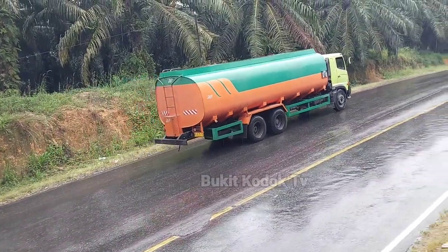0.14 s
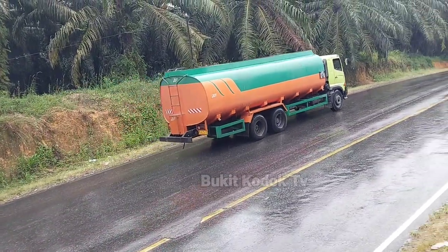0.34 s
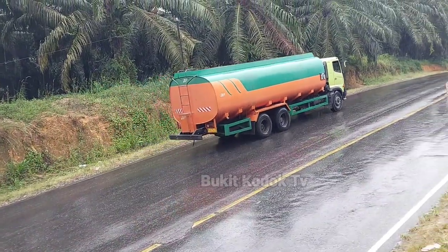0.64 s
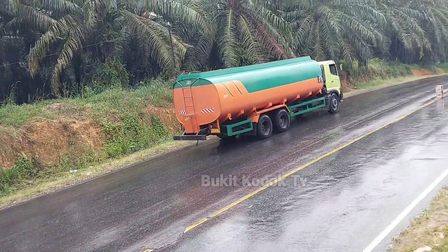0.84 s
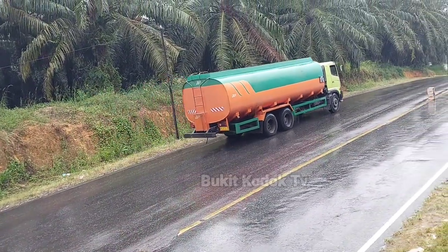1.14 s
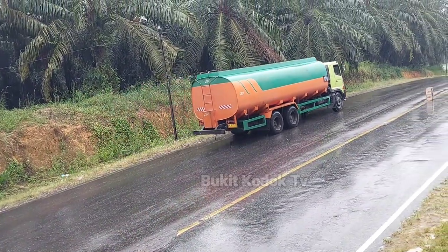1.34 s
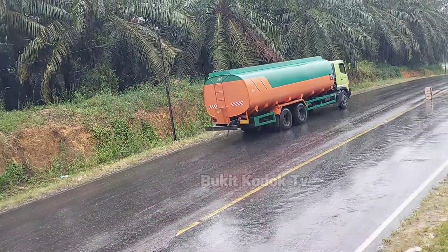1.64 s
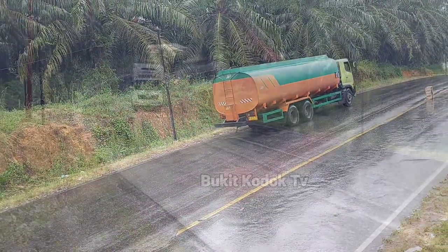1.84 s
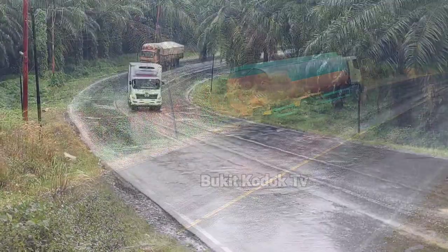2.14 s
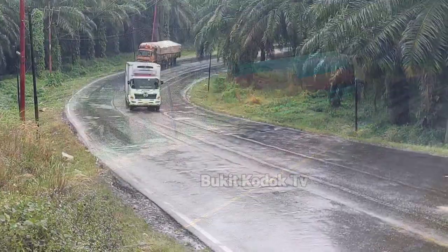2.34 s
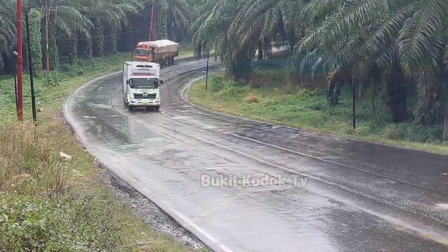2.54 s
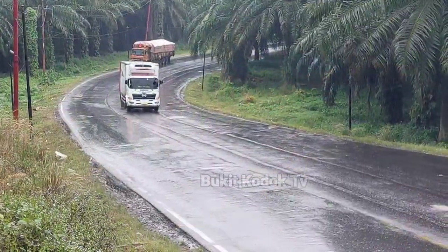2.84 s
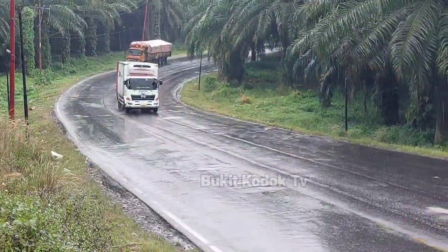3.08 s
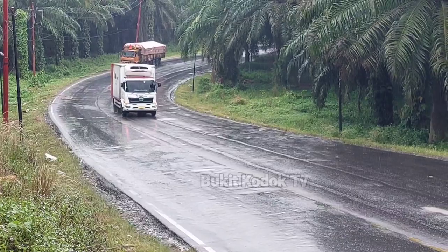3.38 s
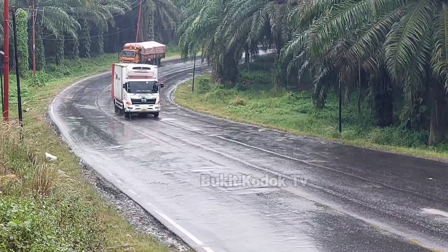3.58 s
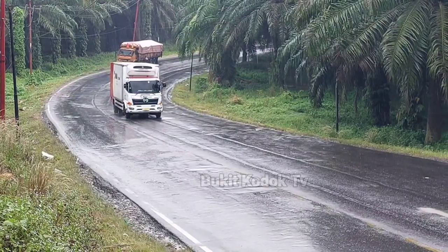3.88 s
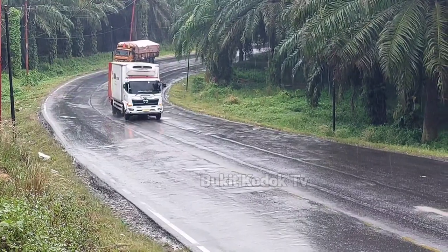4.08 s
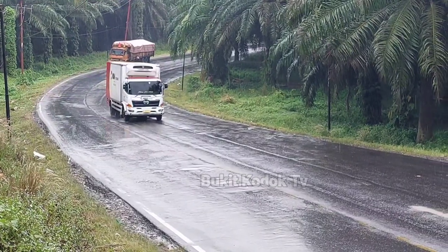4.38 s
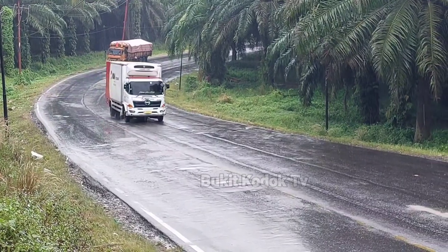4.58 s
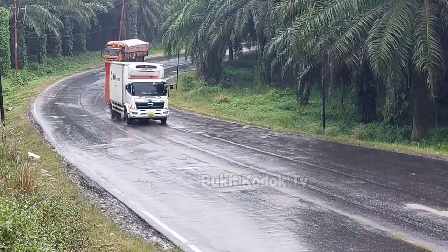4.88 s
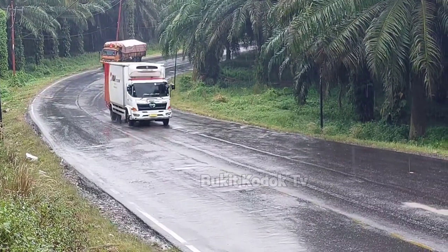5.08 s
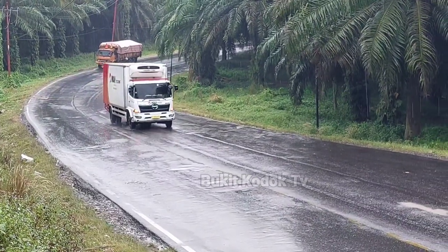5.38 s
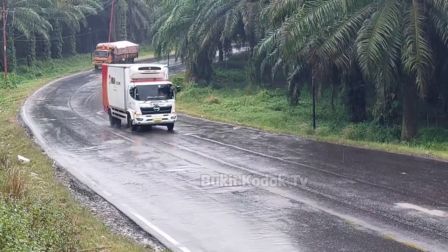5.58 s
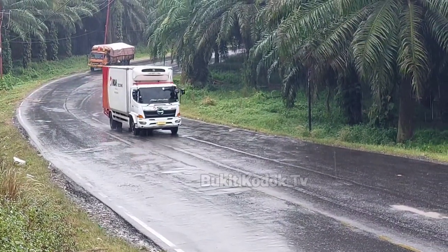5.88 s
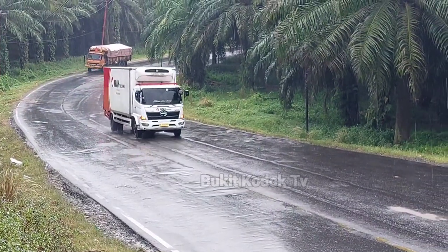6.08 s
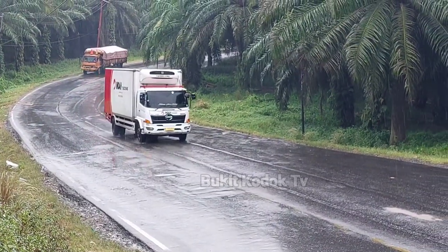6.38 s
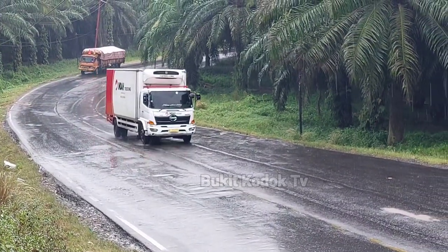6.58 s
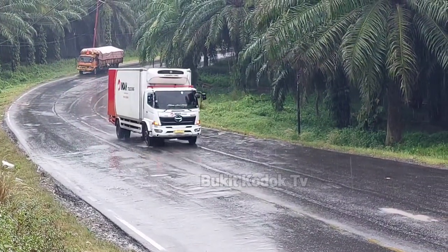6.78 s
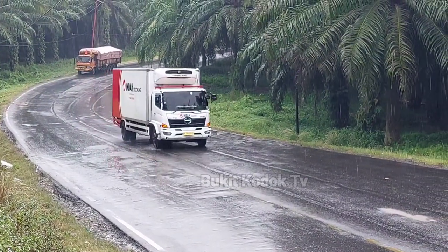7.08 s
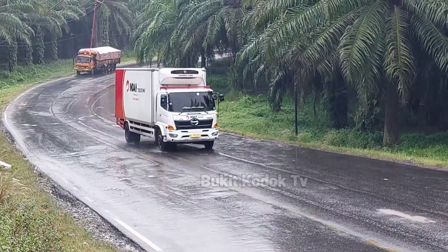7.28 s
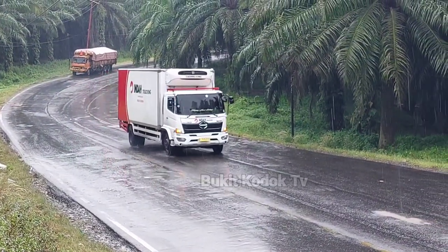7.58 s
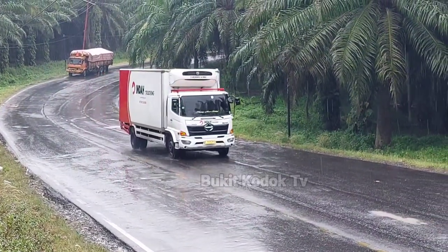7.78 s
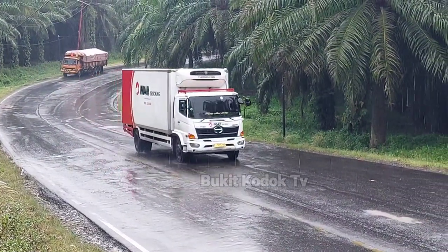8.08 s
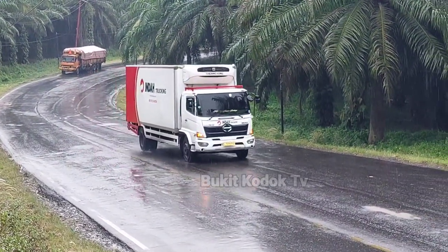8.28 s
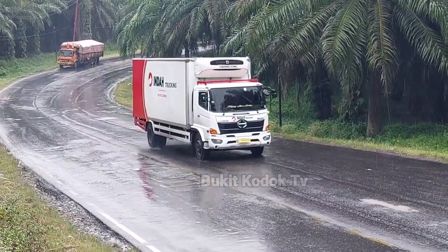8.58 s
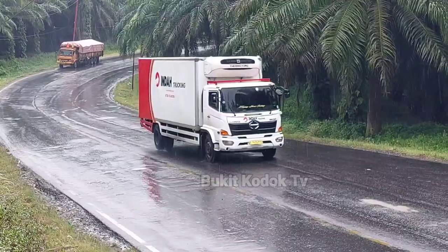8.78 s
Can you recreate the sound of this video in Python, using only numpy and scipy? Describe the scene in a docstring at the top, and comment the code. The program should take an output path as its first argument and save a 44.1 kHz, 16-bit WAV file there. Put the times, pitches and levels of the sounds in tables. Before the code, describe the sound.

A high-revving diesel tanker drives off with roar, thin turbo whistle and wet tyre hiss, then a deeper, lugging truck fades in and approaches.

```python
"""A wet hill road, heard from the verge, with diesel trucks labouring up it.
A six-cylinder tanker pulls away: firing-locked exhaust lines, noise puffs rung through body resonances,
gear whine and a swelling turbo whistle, all faded out by about three seconds.
A four-cylinder box truck fades in and comes nearer: its deep firing note sags under load,
over muffler rasp, block clatter, faint turbo whines, intake rush and filtered-noise tyre hiss."""
import sys
import numpy as np
from scipy import signal
from scipy.fft import rfft, irfft, next_fast_len
from scipy.io import wavfile

SR = 44100
rng = np.random.default_rng(int(sys.argv[2]) if len(sys.argv) > 2 else 0)


def waveform_to_disk(signal):
    """Save audio, clipped to [-1, 1], as 16-bit WAV at the path in sys.argv[1]."""
    frames = np.transpose(np.atleast_2d(signal))
    scaled = np.clip(frames, -1, 1) * 32767
    samples = np.round(scaled).astype(np.int16)
    wavfile.write(sys.argv[1], SR, samples)


N = 393813
TIME = np.arange(N) / SR
SIZE = next_fast_len(N, real=True)
HZ = np.maximum(np.arange(SIZE // 2 + 1) * SR / SIZE, 1)

# exhaust lines locked to the engine: multiple_of_firing_rate, relative_level_db
TANKER_ORDERS = [(.52, -12), (1, 0), (1.88, -14), (2.333, -6.5), (3.39, -13), (4.54, -15), (5.28, -16)]
BOX_ORDERS = [(3, -0.5), (4, -2), (6, -6), (6.65, -6), (7, -9), (7.5, -10), (8, -9), (12.3, -6)]
# singing gears and engine drives: multiple_of_firing_rate, relative_level_db
TANKER_WHINES = [(6.82, -26), (9.43, -14.5), (12.1, -24.5), (14.06, -26), (15.3, -27), (17.3, -27),
                 (25.3, -32), (26.6, -29)]
# strength of each cylinder in firing order: level_db
SIX_CYLINDERS = [0.58, -0.81, 0.31, 0.36, -0.16, 0.98]
FOUR_CYLINDERS = [0.07, 0.11, -0.33, -0.16]
# exhaust and body resonances: centre_hz, width_hz, relative_level_db
TANKER_BODY = [(99, 21, 0.5), (137, 16, 1), (236, 31, -4), (279, 69, -0.7), (328, 34, -2), (438, 55, -11),
               (551, 82, -5.5), (637, 98, -6), (721, 35, -5.5), (1053, 220, -15.5)]
BOX_BODY = [(98, 150, -0.5), (134, 29, 0), (167, 20, -2), (216, 13.5, -1), (238, 51, -2.5)]
# muffler resonances, changing round the bend: centre_hz, width_hz, far_level_db, near_level_db
BOX_MUFFLER = [(378.6, 34, -2, 1.5), (415, 22, 1, -0.5), (447.7, 20, -1.5, 2.5), (489.5, 46, 4, 4.5),
               (546, 29.5, 2, 2), (743, 33, -0.5, -4), (804, 28, -12, -0.5), (898, 24, -10, -8.5),
               (1103, 72, -6.5, -9)]
# ringing of the tanker's engine block: centre_hz, width_hz, relative_level_db
TANKER_BLOCK = [(1045, 26, 6.5), (1493, 33, 2), (1750, 86, 0), (1910, 50, -5), (2110, 31, -0.5),
                (2440, 68, -11), (2530, 52, -10), (3054, 58, -0.5)]
# air intake resonances: centre_hz, width_hz, relative_level_db
INTAKE = [(805, 42, -3), (2340, 180, -10), (3420, 300, 1), (3650, 270, 1.5), (4600, 910, -7)]
# spectrum of the engine block clatter: frequency_hz, relative_level_db
TANKER_CLATTER = [(410, -0.5), (700, 1.5), (870, 0), (1120, -20), (1220, -1.5), (1760, -4.5), (2840, -11.5),
                  (3160, -19), (3900, -60), (4200, -29), (5460, -51), (9240, -120)]
BOX_CLATTER = [(400, -33), (650, -3), (780, -2), (930, -3.5), (1100, -2.5), (1380, -6.5), (1880, -4),
               (2150, -7.5), (2600, -8.5), (3200, -10.5), (3700, -11.5), (4050, -18), (4850, -17),
               (9000, -51)]
# spectrum of the tyre spray: frequency_hz, relative_level_db
TANKER_HISS = [(40, 7), (65, 29.5), (300, 16), (1000, 6), (2100, 11), (3200, 5.5), (3900, 3), (4700, 5),
               (5600, 2.5), (6700, 0.5), (7600, 1.5), (9500, -1.5), (12500, 1), (15500, -5.5)]
BOX_HISS = [(25, 23), (45, 23), (110, 17.5), (300, 21), (1000, 7), (3600, 4), (5500, 3), (7500, 0.5),
            (8700, -3.5), (9700, -1), (12500, -0.5), (15500, -4)]
# stereo width: frequency_hz, side_minus_mid_db
TANKER_WIDTH = [(60, -21), (110, -21), (200, -33), (380, -10), (690, -12), (1280, -3), (2360, -4.5),
                (4350, 3), (8030, 0), (14800, 0)]
BOX_WIDTH = [(60, -17.5), (110, -26), (200, -11), (380, -17.5), (690, -11.5), (1280, -6.5), (2360, -6),
             (4350, -3.5), (8030, 3.5), (14800, 1.5)]
# stereo balance: frequency_hz, left_minus_right_db
TANKER_LEAN = [(60, -1), (110, -3.5), (200, -4.5), (380, -0.5), (690, -3), (1280, -5.5), (2360, -2),
               (4350, 0.5), (8030, 1), (14800, 0.5)]
BOX_LEAN = [(60, -5), (110, 2), (200, -5), (380, -1), (690, -2), (1280, -1.5), (2360, 1), (4350, -2),
            (8030, 1), (14800, 2.5)]
# swells of the tanker's exhaust roar: centre_s, half_width_s, height_db
ROAR_SWELLS = [(.03, .25, -2.5), (.45, 0.15, 1.6), (.85, .17, 1.5), (1.251, .15, 0.4), (1.72, 0.12, 1.6),
               (2.5, .12, -1)]
# swells of the box truck's mutter: centre_s, half_width_s, boom_db, rasp_db, clatter_db
MUTTER_SWELLS = [(2.95, .2, -1.5, 2, 0.5), (3.3, 0.21, 3.5, 0, 1), (3.53, .07, 0, 1.5, -0.5),
                 (3.7, 0.2, -2, -0.5, 1), (4.25, 0.31, 0, 0.5, 2), (5.2, .06, 0, 1.5, -0.5),
                 (5.25, 0.32, 3, -1, 1), (5.7, 0.26, -0.5, -1.5, -1), (6.05, 0.069, -8, -1, 0),
                 (6.55, 0.12, 2.5, -2, 0.5), (7.2, 0.22, 1, 1.5, 0), (7.5, 0.1, -4, -1.5, -1),
                 (8.15, 0.17, 4, 0.5, 1.5), (8.6, 0.22, 2.5, 1.5, 1.5)]
# dips of the box truck's note on its way through the air: centre_s, depth_db, half_width_s, phase_lag_rad
NOTE_DIPS = [(3.33, 7, 0.15, -0.42), (3.71, 6.5, 0.08, 0.5), (3.98, 11.5, 0.074, 1.8),
             (4.22, 3.5, 0.057, 0), (4.42, 3, 0.067, -0.67), (4.8, 4.5, 0.15, 2.1), (5.33, 2, 0.18, 0.39),
             (5.93, 2.5, 0.19, -0.2), (7.05, 3, .16, -1.2), (8.27, 2, 0.18, 1)]
# swells of the tanker's turbo whistle: start_s, end_s, starting_pitch_hz, relative_level_db
WHISTLE_SWELLS = [(-.06, .42, 4405, -33.5), (0.25, .52, 4430, -44), (.52, .72, 4460, -38),
                  (0.8, .99, 4475, -35.5), (0.98, 1.45, 4400, -43), (1.33, 1.96, 4390, -34.5),
                  (1.88, 2.24, 4360, -33), (2.14, 2.74, 4365, -34.5), (2.62, 3.1, 4360, -39),
                  (1.4, 2.75, 4260, -43)]
# breathy strands of the tanker's turbo: pitch_hz, relative_level_db
BREATHY_STRANDS = [(3290, -42.5), (5140, -42), (5205, -40), (5285, -41)]
# box truck turbo whines, as the intake turns to the verge: entry_pitch_hz, level_db, loudest_s, half_width_s
BOX_WHINES = [(3800, -55, 6.9, 1.7), (4850, -61, 6.7, 1.3), (9850, -64, 7.4, 2.7)]
# surges and lulls of the spray: centre_s, half_width_s, height_db
SPRAY_SURGES = [(.33, 0.065, -1.5), (0.469, 0.06, -1), (1.65, 0.3, 0.3), (2.45, 0.048, -1.2),
                (2.61, .05, 4.5), (2.73, 0.12, -4)]
BOX_SURGES = [(2.85, .13, 1.5), (4.45, .14, .7), (5.6, 0.22, -.6), (6.8, 0.55, .5)]   # wetter and drier road

# tanker engine (firings per s): picks up the last of its revs, then hovers
TANKER_HZ, PICKUP_HZ, PICKUP_S = 121.4, 1.9, 0.3
HUNT_HZ = 0.2   # slow hunting of either engine's firing rate
# the roar sinks as the tanker drives off; the note builds as the tailpipe comes into view
TANKER_NOTE_DB, NOTE_BUILD_DB, NOTE_BUILD_S = -20.3, 15, 0.28
ROAR_DB, RECEDE_DB_PER_S, TANKER_SPRAY_DB = -22.5, 2, -27.5
TANKER_FADE_S, TANKER_GONE_S = 1.46, 2.87
# tanker turbo
WHISTLE_ATTACK_S, WHISTLE_RELEASE_S = 0.083, 0.13
WHISTLE_SAG_HZ_PER_S, WHISTLE_WANDER_HZ = 52, 8.35
BREATHY_WANDER_HZ, BREATHY_BUILD_DB, BREATHY_BUILD_S = 17, 2, 0.75
BREATHY_END_S, BREATHY_RELEASE_S = 2.08, 1.28
# box truck: fade-in, and the firing rate (firings per s) at entry, dragged down by the hill
BOX_ENTERS_S, BOX_FADE_S = 1.8, 1
BOX_HZ, SAG_HZ_PER_S = 79.6, 2.36
# box truck approach: distance at entry, road speed, and its bend
DISTANCE_M, SPEED_M_PER_S = 77, 6
BEND_S, BEND_LENGTH_S = 4.6, 2.4
BOX_LAG_S = 4.5e-5   # later arrival on the right side
# box truck firing note, and the tailpipe resonance that lifts its octave
BOX_NOTE_DB, BOX_NOTE_FULL_S = -12.8, 3.15
BOX_NOTE_BUILD_DB_PER_S, BOX_NOTE_RISE_DB, NOTE_WAVER_RAD = 22.5, 10, 0.27
PIPE_HZ, PIPE_HALF_WIDTH_HZ, OCTAVE_DB = 130.5, 6, -36.3
WHINE_SAG_PER_S, WHINE_WANDER = 0.0045, 0.0019   # shares of the pitch
CUTOFF_HZ = 15450


def tanker():
    """Six cylinders at high revs, driving away; the engine fades along a steeper curve than the note."""
    speed = TANKER_HZ - PICKUP_HZ * np.exp(-TIME / PICKUP_S) + HUNT_HZ * drift(0.95)
    firing = turns(speed)
    recede_db = -RECEDE_DB_PER_S * TIME
    fade = release(TANKER_GONE_S, TANKER_GONE_S - TANKER_FADE_S)
    beat = rattle(firing, SIX_CYLINDERS, TANKER_HZ, slack=0.025)
    layers = tanker_roar(firing, beat) + tanker_clatter(firing, beat) + tanker_tones(firing, speed)
    engine = from_db(ROAR_DB + recede_db) * layers
    return fade ** 0.5 * tanker_note(firing, recede_db) + fade ** 0.93 * engine + tanker_spray()


def tanker_note(firing, recede_db):
    """Firing note and its near-half-rate line: pressure pulses from the tailpipe, building then receding."""
    note_db = TANKER_NOTE_DB - NOTE_BUILD_DB * np.exp(-TIME / NOTE_BUILD_S) + 1.3 * recede_db
    note = exhaust_note(firing, TANKER_ORDERS[:2], waver_db=1.8, overtone_waver=0.61)
    return pan(from_db(note_db) * note, left_db=-1.0)


def tanker_roar(firing, beat):
    """Turbulent gas, pulsed at each firing and rung through the exhaust and body."""
    gas = rms_one(puffs(firing, SIX_CYLINDERS, depth=0.2))
    gas = gas + 0.25 * knocks(firing, SIX_CYLINDERS, uneven=0.15) + 0.75 * beat
    roar = outdoors(gas, resonances(TANKER_BODY), TANKER_WIDTH, TANKER_LEAN)
    return from_db(table_swells(ROAR_SWELLS)) * roar


def tanker_clatter(firing, beat):
    """Combustion noise and valve rattle ring the engine block."""
    casing = gain_at(TANKER_CLATTER, HZ) + from_db(-5.5) * resonances(TANKER_BLOCK)
    source = puffs(firing, SIX_CYLINDERS, depth=0.18) + 0.8 * beat
    block = outdoors(source, casing, TANKER_WIDTH, TANKER_LEAN)
    return from_db(-6.0) * patchy(block, depth_db=2.0, rate=14, count=24)


def tanker_tones(firing, speed):
    """Upper exhaust lines and gear whines, both tied to the revs; the exhaust lines sink faster."""
    lines = exhaust_note(firing, TANKER_ORDERS[2:], waver_db=3.0, overtone_waver=0.8)
    gears = 0
    for multiple, db in TANKER_WHINES:
        gears = gears + from_db(db) * whistle(multiple * speed, spread_hz=14.0, rough=1.0)
    return pan(from_db(-6.3 - 3.5 * TIME) * lines + from_db(-1.2 * TIME) * gears, left_db=0.5)


def box_truck():
    """Four cylinders lugging at low revs, coming closer."""
    speed = BOX_HZ - SAG_HZ_PER_S * (TIME - BOX_ENTERS_S) + HUNT_HZ * drift(2)
    firing = turns(speed)
    revs = speed / BOX_HZ
    turned = ramp(BEND_S, BEND_LENGTH_S)
    s, half_width, *heights_db = np.transpose(MUTTER_SWELLS)
    boom_swell, rasp_swell, clatter_swell = (from_db(swells(s, half_width, db)) for db in heights_db)

    muffler = np.array(BOX_MUFFLER)
    low = resonances(BOX_BODY)
    far, near = resonances(muffler[:, [0, 1, 2]]), resonances(muffler[:, [0, 1, 3]])

    fade = ramp(BOX_ENTERS_S, BOX_FADE_S)
    lines = box_lines(firing, low + (far + near) / 2)
    overtones = box_octave(firing, speed) + boom_swell * box_growl(firing, revs) + rasp_swell * lines
    tones = pan(np.sqrt(fade) * box_note(firing) + fade * overtones, left_db=-2.5)
    mutter = boom_swell * box_boom(firing, revs, low) + rasp_swell * box_rasp(firing, far, near, turned)
    return tones + fade * (mutter + clatter_swell * box_clatter(firing) + box_spray())


def box_note(firing):
    """The deep firing note: it builds, then holds, wavering a little, with brief dips that bend its pitch."""
    build_db = np.clip(BOX_NOTE_BUILD_DB_PER_S * (BOX_NOTE_FULL_S - TIME), 0, BOX_NOTE_RISE_DB)
    s, depth_db, half_width, lag = np.transpose(NOTE_DIPS)
    dip_db = swells(s, half_width, depth_db)
    waver = NOTE_WAVER_RAD * drift(3.4) - swells(s, half_width, lag)
    level = from_db(BOX_NOTE_DB - build_db - dip_db + 0.54 * drift(5.7))
    return level * np.sin(2 * np.pi * firing + waver)


def box_octave(firing, speed):
    """The note's octave, swelling as the sagging revs carry it into a tailpipe resonance."""
    pipe = from_db(OCTAVE_DB) / np.hypot(1, (2 * speed - PIPE_HZ) / PIPE_HALF_WIDTH_HZ)
    return pipe * exhaust_note(firing, [(2, 0)], waver_db=3.0, overtone_waver=0.19)


def box_growl(firing, revs):
    """A half-order line from uneven cylinders, weakening with the revs."""
    growl = exhaust_note(firing, [(3.5, 0)], waver_db=2.0, overtone_waver=0.35)
    return from_db(-42.5) * revs ** 1.54 * growl


def box_lines(firing, colour):
    """Higher exhaust lines, lighting up as the sagging revs carry them through the resonances."""
    lines = exhaust_note(firing, BOX_ORDERS, waver_db=3.0, overtone_waver=0.65)
    rung = irfft(rfft(lines, SIZE) * colour, SIZE)[:N]
    return approaching(-42.5, follows=0.3) * rms_one(rung)


def box_boom(firing, revs, low):
    """Gas puffs ring the low exhaust and body resonances, weakening with the revs."""
    boom = outdoors(puffs(firing, FOUR_CYLINDERS, depth=0.071), low, BOX_WIDTH, BOX_LEAN)
    return from_db(-34.0) * revs ** 3.3 * boom


def box_rasp(firing, far, near, turned):
    """Pulsed gas rasps in the muffler, whose colour crossfades as the truck comes round the bend."""
    gas = rms_one(puffs(firing, FOUR_CYLINDERS, depth=0.25))
    gas = gas + 0.4 * knocks(firing, FOUR_CYLINDERS, uneven=0.2)
    gas = gas + 0.75 * rattle(firing, FOUR_CYLINDERS, BOX_HZ, slack=0.02)
    before = (1 - turned) * outdoors(gas, far, BOX_WIDTH, BOX_LEAN)
    after = turned * outdoors(gas, near, BOX_WIDTH, BOX_LEAN)
    return approaching(-41.5, follows=0.56) * (before + after)


def box_clatter(firing):
    """Combustion noise radiated by the engine block, its bands swelling separately."""
    source = puffs(firing, FOUR_CYLINDERS, depth=0.12)
    block = outdoors(source, gain_at(BOX_CLATTER, HZ), BOX_WIDTH, BOX_LEAN)
    level = approaching(-41.0, follows=0.02) * from_db(0.5 * drift(4.0))
    return level * patchy(block, depth_db=1.5, rate=8.4, count=9)


def tanker_turbo():
    """A thin rotor whistle in swells and a few breathy strands, reaching each side by a different path."""
    thin_whistle = 0
    for start, end, hz, db in WHISTLE_SWELLS:
        pitch = hz - WHISTLE_SAG_HZ_PER_S * (TIME - start) + WHISTLE_WANDER_HZ * drift(7.1)
        thin = from_db(-2.0 + 1.5 * drift(13.0)) * whistle(pitch, spread_hz=32, rough=1.8)
        echo = from_db(-8.0) * np.array([whistle(pitch, spread_hz=130, rough=1.8) for side in "LR"])
        swell = from_db(db) * ramp(start, WHISTLE_ATTACK_S) * release(end, WHISTLE_RELEASE_S)
        thin_whistle = thin_whistle + swell * (thin * [[1], [-0.4]] + echo)
    breathy, sway = 0, drift(2.48)   # the strands share the sway
    for hz, db in BREATHY_STRANDS:
        pitch = hz + BREATHY_WANDER_HZ * (drift(4.06) + sway)
        strand = np.array([whistle(pitch, spread_hz=68, rough=3.5) for side in "LR"])
        breathy = breathy + from_db(db) * strand
    build = from_db(-BREATHY_BUILD_DB * (1.5 - ramp(0, BREATHY_BUILD_S)))
    breathy = release(BREATHY_END_S, BREATHY_RELEASE_S) * build * breathy
    return release(end_s=2.94, length_s=1.6) ** 0.63 * thin_whistle + breathy


def box_turbo():
    """Faint whines sinking with the boost, over intake rush that opens up as the cab comes round the bend."""
    rush = outdoors(rng.standard_normal((2, N)), resonances(INTAKE), BOX_WIDTH, BOX_LEAN)
    boost = 1 - WHINE_SAG_PER_S * (TIME - BOX_ENTERS_S) + WHINE_WANDER * drift(1.0)
    whines = 0
    for hz, db, at, half_width in BOX_WHINES:
        tone = np.array([whistle(hz * boost, spread_hz=54, rough=2.0) for side in "LR"])
        whines = whines + swells([at], [half_width], [from_db(db)]) * tone
    intake = approaching(-55.0, follows=2.0) * from_db(1.2 * drift(7.0)) * rush
    return whines + ramp(start_s=5.44, length_s=1.4) * intake


def tanker_spray():
    """Tyre hiss: coloured noise in surges and lulls, with a fade of its own."""
    hiss = outdoors(rng.standard_normal((2, N)), gain_at(TANKER_HISS, HZ), TANKER_WIDTH, TANKER_LEAN)
    level = from_db(TANKER_SPRAY_DB + table_swells(SPRAY_SURGES))
    return release(end_s=3.004, length_s=1.34) ** 0.82 * level * hiss


def box_spray():
    """Water thrown off the tread in uneven sheets: coloured noise of wavering level."""
    splash = rng.standard_normal((2, N)) * from_db(0.5 * drift(9) + table_swells(BOX_SURGES))
    return approaching(-42.7, follows=0.7) * outdoors(splash, gain_at(BOX_HISS, HZ), BOX_WIDTH, BOX_LEAN)


def puffs(firing, cylinders, depth):
    """A burst of turbulence at each firing, every cylinder with its own strength."""
    strength = from_db(cylinders)[firing.astype(int) % len(cylinders)]
    return rng.standard_normal((2, N)) * strength * np.exp(depth * np.cos(2 * np.pi * firing))


def knocks(firing, cylinders, uneven):
    """One pressure pulse per firing, each of chance strength; rms 1."""
    fired = np.diff(np.floor(firing), prepend=0)
    strength = from_db(cylinders)[firing.astype(int) % len(cylinders)]
    return rms_one(fired * strength * (1 + uneven * rng.standard_normal(N)))


def rattle(firing, cylinders, firing_hz, slack):
    """Valves and injectors rattle in a pattern that repeats each engine cycle and slowly changes."""
    size = int(len(cylinders) * SR / firing_hz)   # samples per engine cycle
    place = ((firing + slack * drift(3)) / len(cylinders) * size).astype(int) % size
    patterns = rng.standard_normal((6, 2, size))   # six to blend, each direct and scattered
    return rms_one(sum(pattern[:, place] * drift(1.5) for pattern in patterns))


def exhaust_note(firing, orders, waver_db, overtone_waver):
    """Lines locked to the engine; the phase wavers away from the firing note, and every level wavers."""
    out = 0
    for order, db in orders:
        loose = overtone_waver * min(abs(order - 1), 1)
        phase = (2 * np.pi * order * firing + loose * drift(3.6)).astype(np.float32)
        out = out + from_db(db + waver_db * drift(11.7)) * np.sin(phase)
    return rms_one(out)


def whistle(hz, spread_hz, rough):
    """A fast rotor's tone: a steady core, with turbulent air scattering a narrow band around it."""
    phase = (2 * np.pi * (turns(hz) % 1)).astype(np.float32)
    scatter = rough / np.sqrt(2)
    in_phase = (1 + scatter * drift(spread_hz)) * np.cos(phase)
    return rms_one(in_phase + scatter * drift(spread_hz) * np.sin(phase))


def resonances(modes):
    """Gain of a set of steep-sided resonances, summed in power."""
    power = 0
    for hz, width, db in modes:
        skirt = 1 + ((HZ - hz * hz / HZ) / (1.59 * width)) ** 2
        power = power + from_db(db) ** 2 / (skirt * skirt * skirt)
    return np.sqrt(power)


def outdoors(pair, colour, width, lean):
    """Colour a direct and a scattered signal and spread them over both sides by frequency; rms 1."""
    direct, scattered = rfft(pair, SIZE) * colour
    side = scattered * gain_at(width, HZ)
    tilt = np.sqrt(gain_at(lean, HZ))
    return rms_one(irfft([(direct + side) * tilt, (direct - side) / tilt], SIZE)[:, :N])


def patchy(x, depth_db, rate, count):
    """Moving air lets neighbouring bands swell and sink on their own; rms 1."""
    spectrum, centres = rfft(x, SIZE), np.log(np.geomspace(400, 4000, count))
    out = 0
    for one in np.eye(count):   # overlapping triangular bands
        band = irfft(spectrum * np.interp(np.log(HZ), centres, one), SIZE)[:, :N]
        out = out + band * from_db(depth_db * drift(rate))
    return rms_one(out)


def approaching(db, follows):
    """Gain following a share of the box truck's growing nearness; db is its level halfway."""
    distance = np.maximum(DISTANCE_M - SPEED_M_PER_S * (TIME - BOX_ENTERS_S), 1)
    halfway = np.median(distance[TIME > BOX_ENTERS_S])
    return from_db(db) * (halfway / distance) ** follows


def swells(s, half_width, height):
    """Sum of smooth, brief rises or dips."""
    return sum(h * np.exp(-np.minimum(((TIME - at) / w) ** 2, 20))
               for at, w, h in zip(s, half_width, height))


def table_swells(table):
    """Level curve in dB from rows of centre_s, half_width_s, height_db."""
    return swells(*np.transpose(table))


def ramp(start_s, length_s):
    """Rises from 0 to 1, then holds."""
    return np.clip((TIME - start_s) / length_s, 0, 1)


def release(end_s, length_s):
    """Holds 1, then falls to 0 at the end."""
    return np.clip((end_s - TIME) / length_s, 0, 1)


def drift(rate):
    """Slow chance of spread 1, changing about rate times a second."""
    step, settle = 40, 2000   # drawn every 40 samples; the filter's start is dropped
    r = np.exp(-2 * np.pi * rate * step / SR)
    noise = rng.standard_normal(N // step + settle + 2)
    slow = signal.lfilter([1], [1, -2 * r, r * r], noise)[settle:]
    return np.interp(np.arange(N) / step, np.arange(len(slow)), rms_one(slow))


def turns(hz):
    """Cycles completed so far."""
    return np.cumsum(hz) / SR


def pan(x, left_db):
    """Place a source between the two sides; left_db is left minus right."""
    return x * from_db([[left_db / 2], [-left_db / 2]])


def gain_at(points, hz):
    """Gain of a frequency_hz, level_db table, joined on a log-frequency axis."""
    f, db = np.transpose(points)
    return from_db(np.interp(np.log(hz), np.log(f), db))


def from_db(db):
    """Decibels to gain."""
    return np.exp(np.asarray(db) * (np.log(10) / 20))


def rms_one(x):
    """Scale to unit power."""
    return x / np.sqrt(np.mean(x ** 2) + 1e-20)


def scene():
    """One truck gives way to the other, whose sound reaches the right side slightly late."""
    left, right = box_truck() + box_turbo()
    box = np.array([left, np.interp(TIME - BOX_LAG_S, TIME, right)])
    return tanker() + tanker_turbo() + box


def record(dry):
    """Cut the top steeply, over 200 Hz around the cutoff."""
    passed = np.clip((CUTOFF_HZ - HZ) / 200 + 0.5, 0, 1)
    return irfft(rfft(dry, SIZE) * passed, SIZE)[:, :N]


dry = scene()
out = record(dry)
waveform_to_disk(out)
```